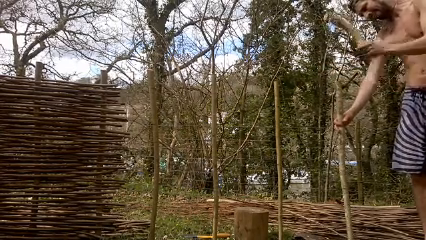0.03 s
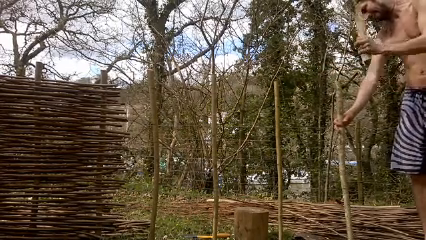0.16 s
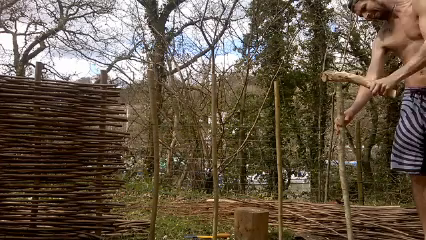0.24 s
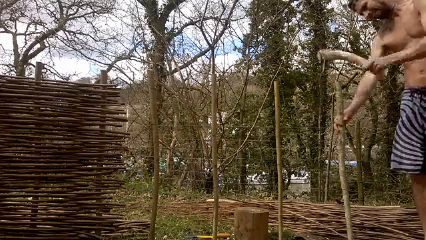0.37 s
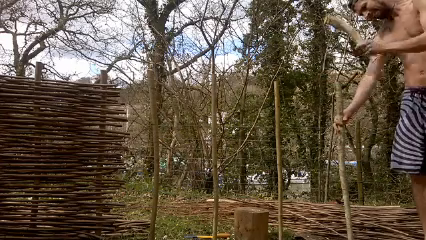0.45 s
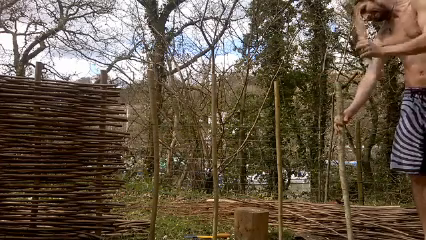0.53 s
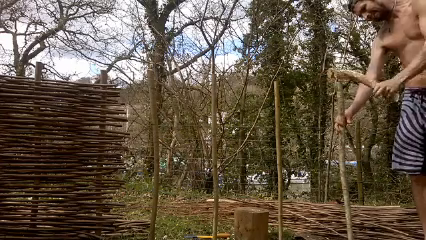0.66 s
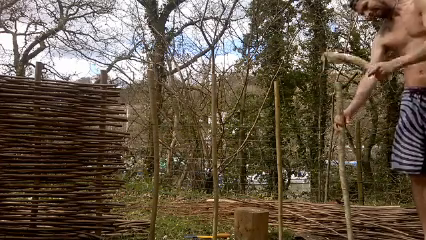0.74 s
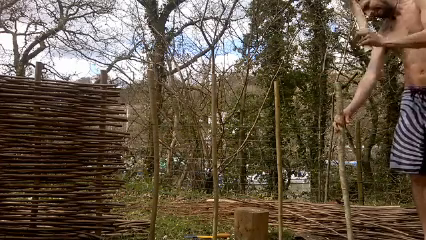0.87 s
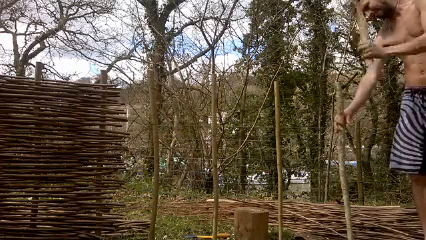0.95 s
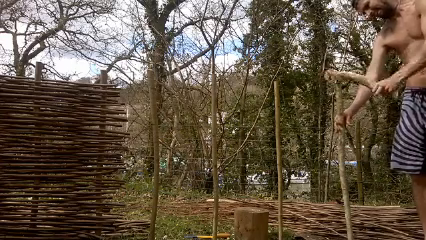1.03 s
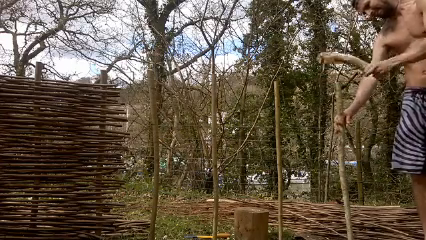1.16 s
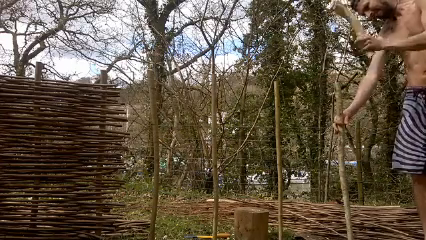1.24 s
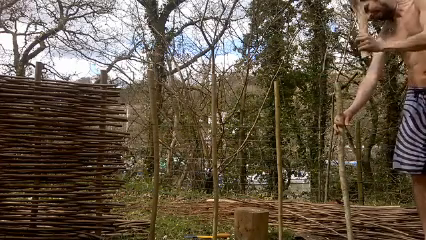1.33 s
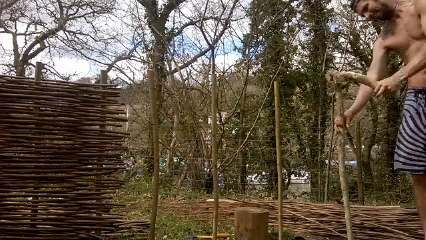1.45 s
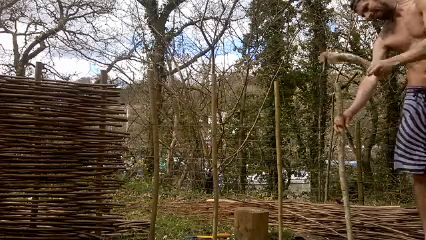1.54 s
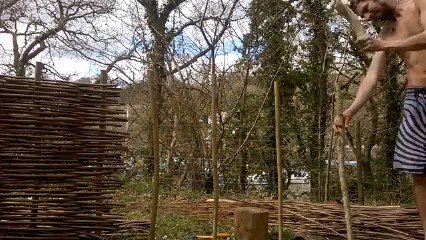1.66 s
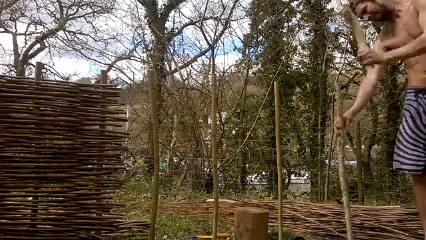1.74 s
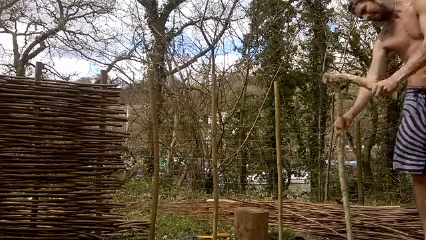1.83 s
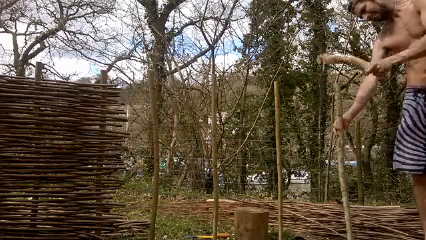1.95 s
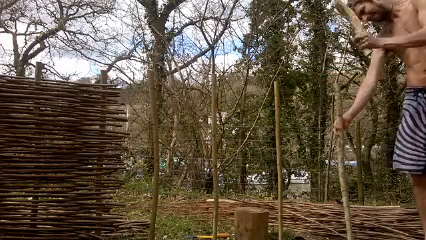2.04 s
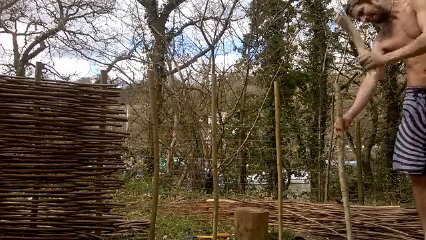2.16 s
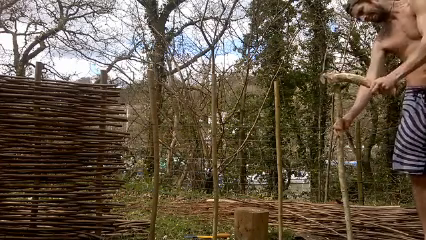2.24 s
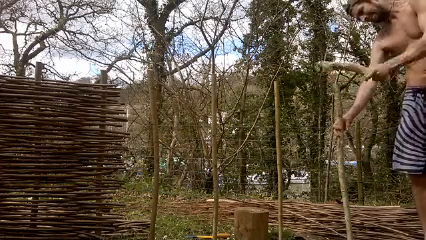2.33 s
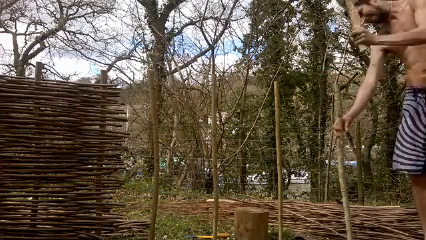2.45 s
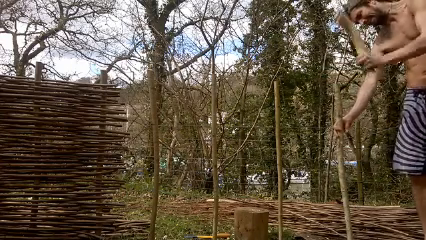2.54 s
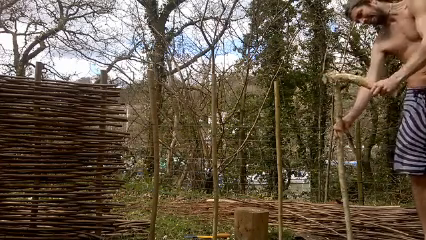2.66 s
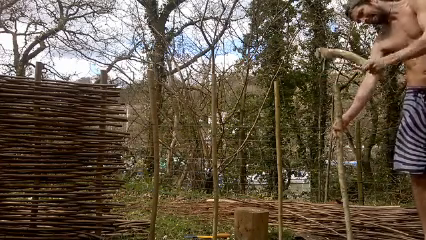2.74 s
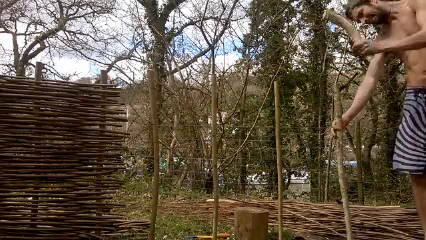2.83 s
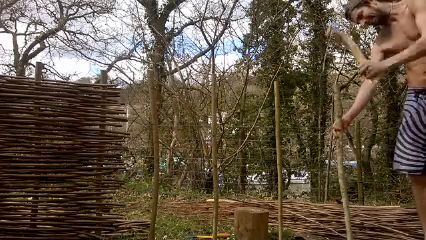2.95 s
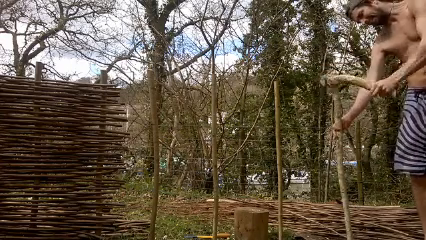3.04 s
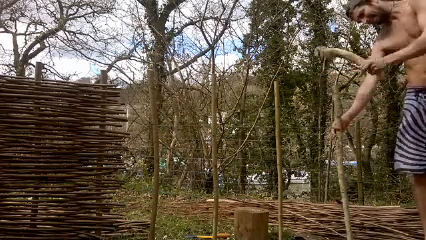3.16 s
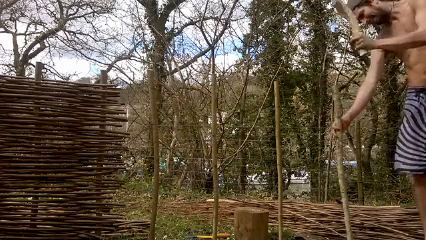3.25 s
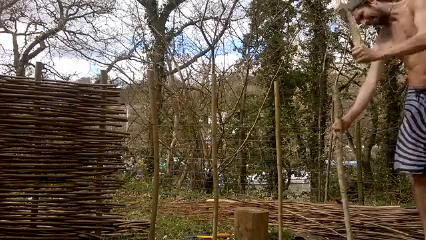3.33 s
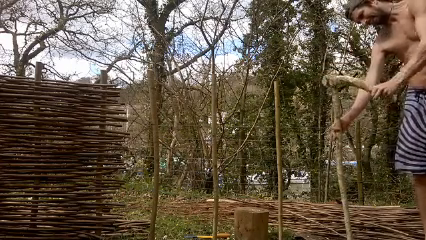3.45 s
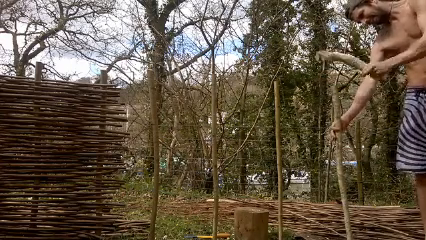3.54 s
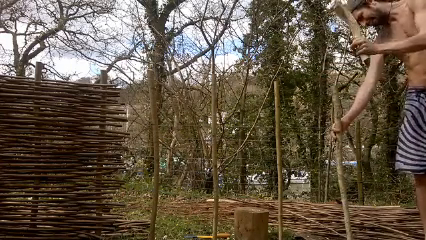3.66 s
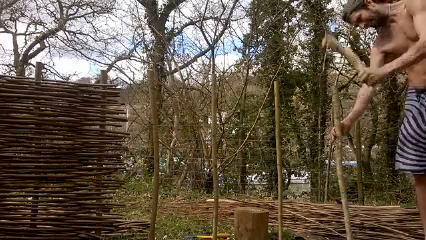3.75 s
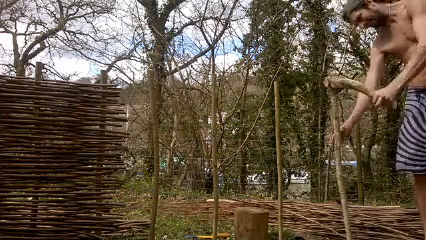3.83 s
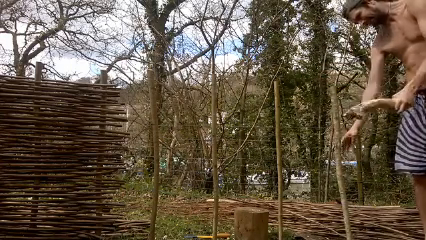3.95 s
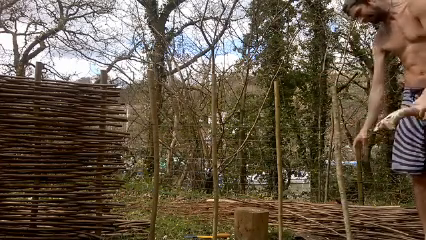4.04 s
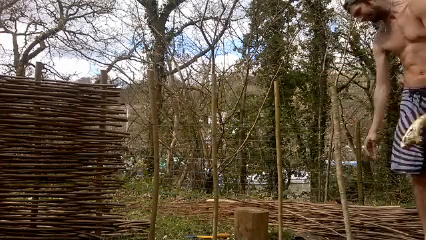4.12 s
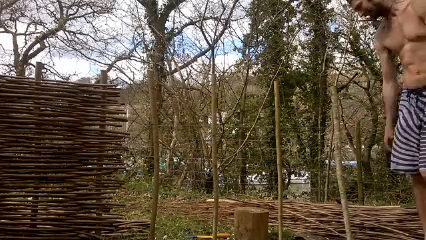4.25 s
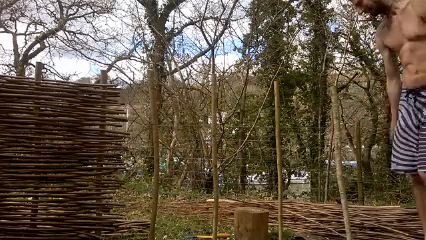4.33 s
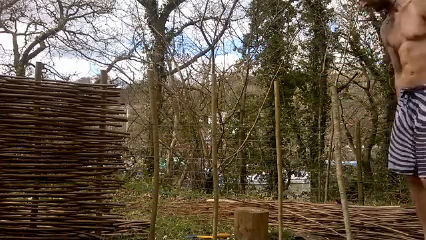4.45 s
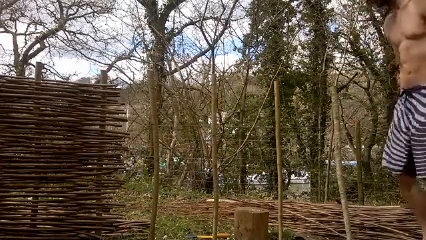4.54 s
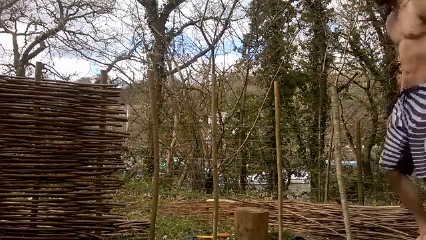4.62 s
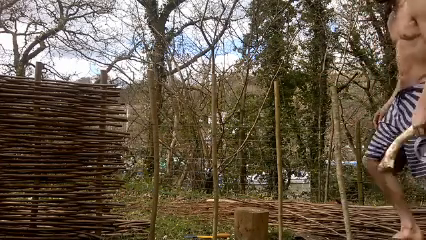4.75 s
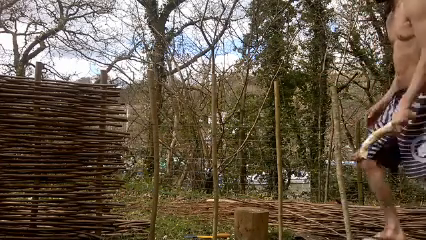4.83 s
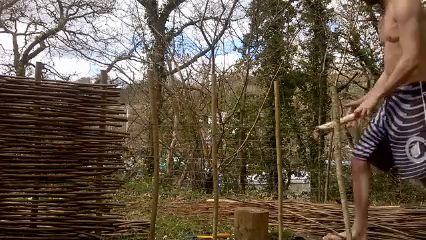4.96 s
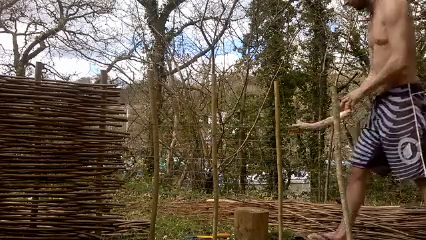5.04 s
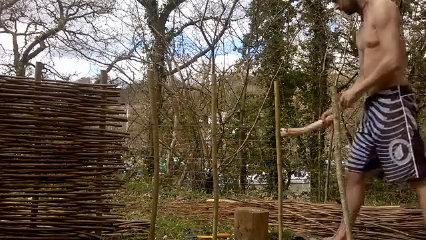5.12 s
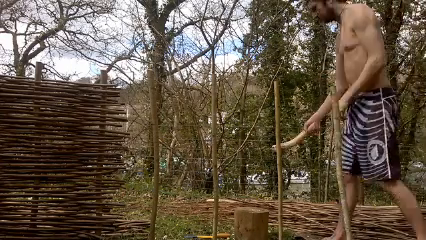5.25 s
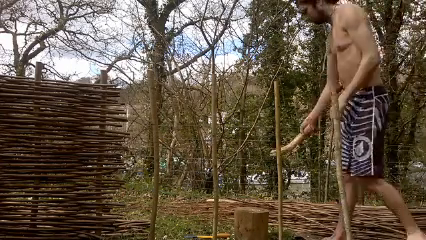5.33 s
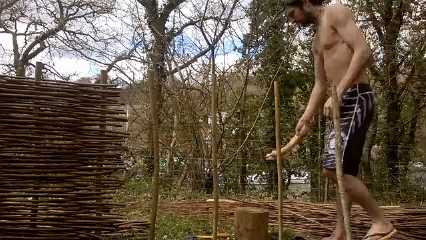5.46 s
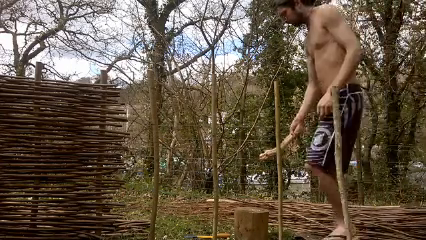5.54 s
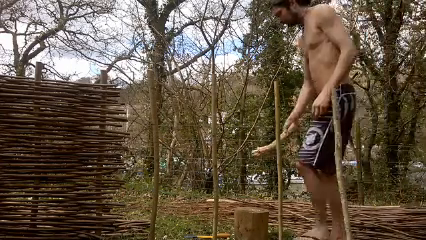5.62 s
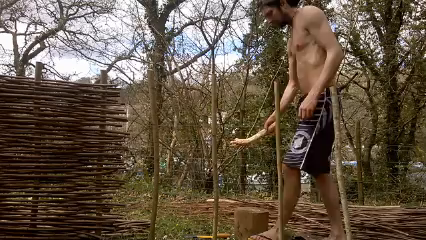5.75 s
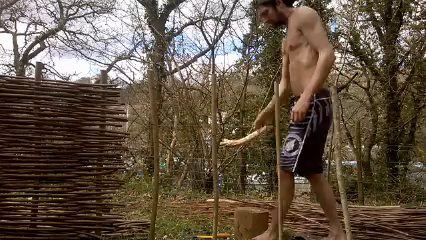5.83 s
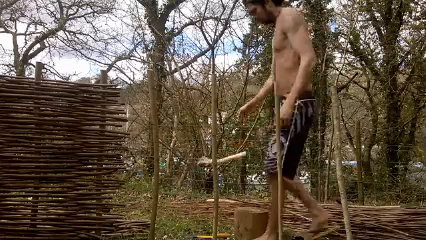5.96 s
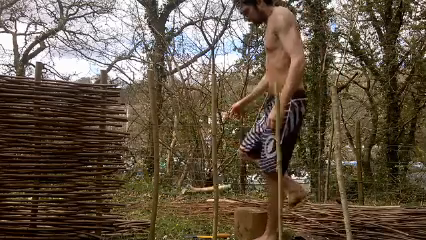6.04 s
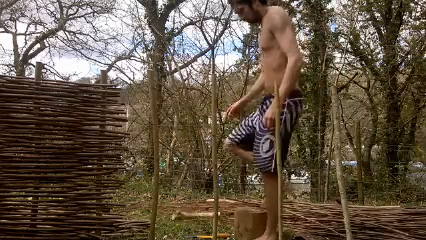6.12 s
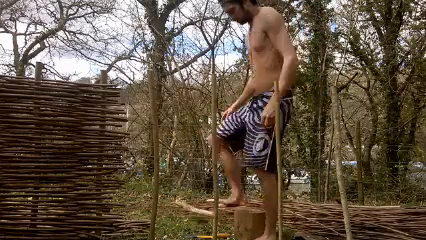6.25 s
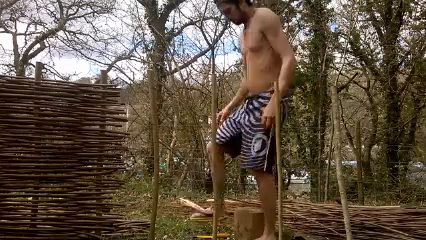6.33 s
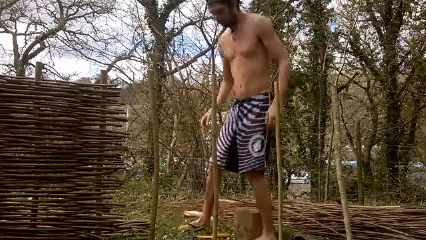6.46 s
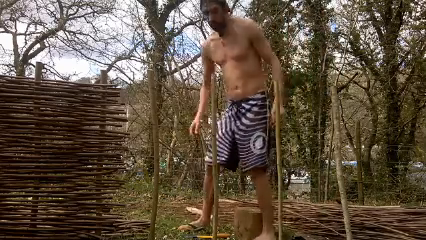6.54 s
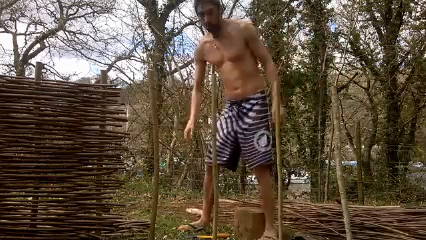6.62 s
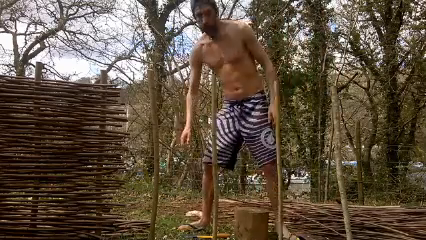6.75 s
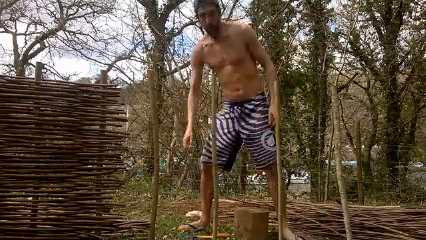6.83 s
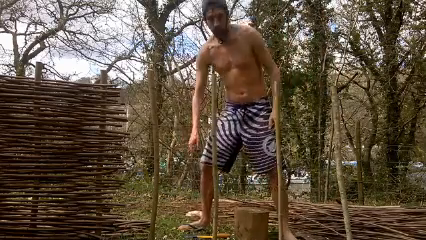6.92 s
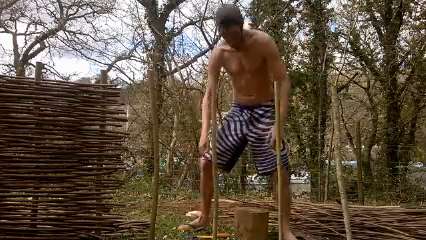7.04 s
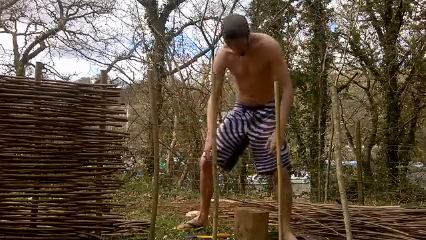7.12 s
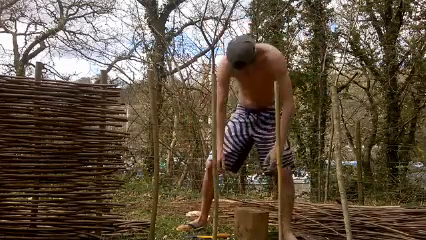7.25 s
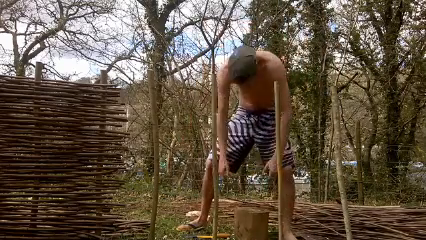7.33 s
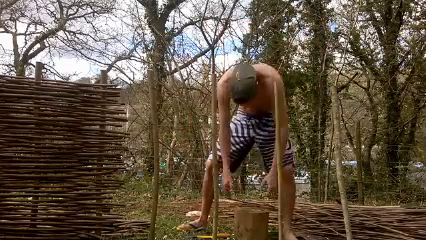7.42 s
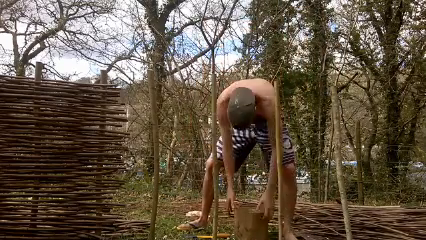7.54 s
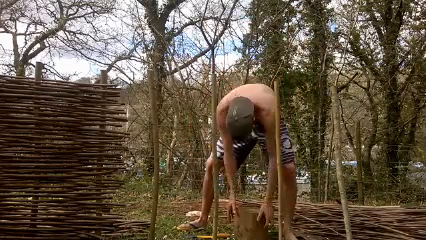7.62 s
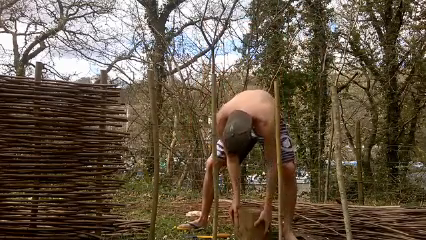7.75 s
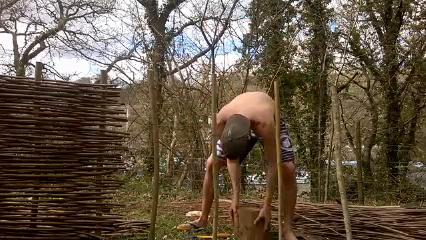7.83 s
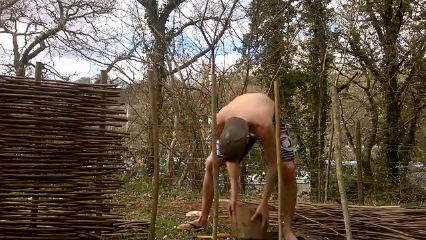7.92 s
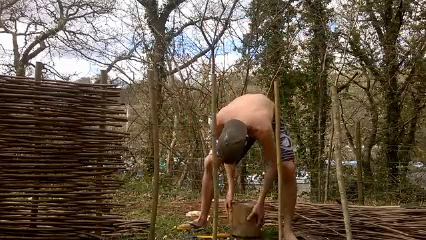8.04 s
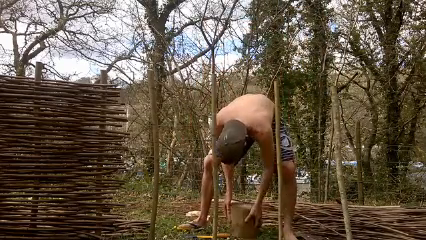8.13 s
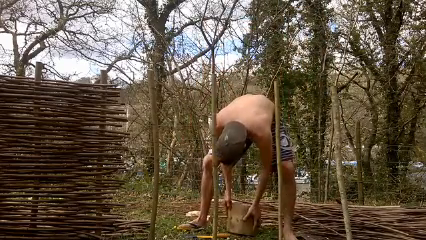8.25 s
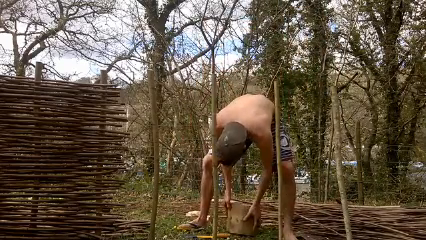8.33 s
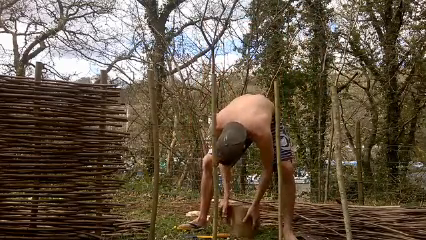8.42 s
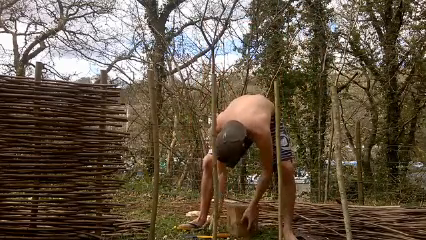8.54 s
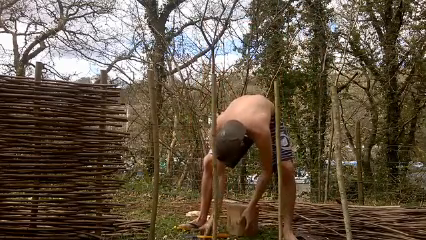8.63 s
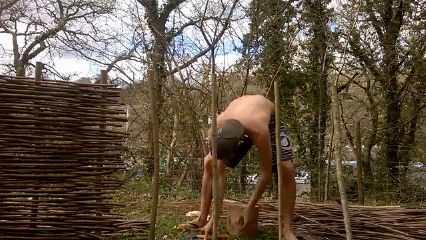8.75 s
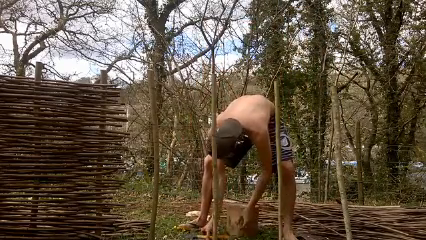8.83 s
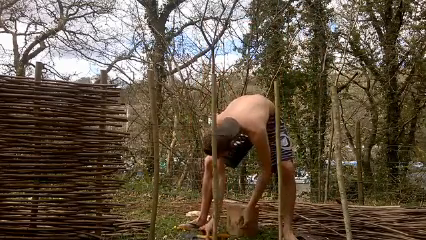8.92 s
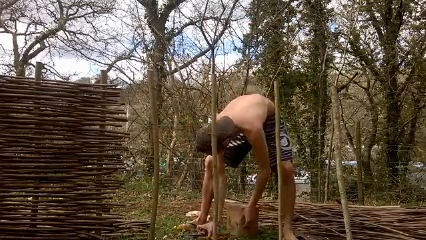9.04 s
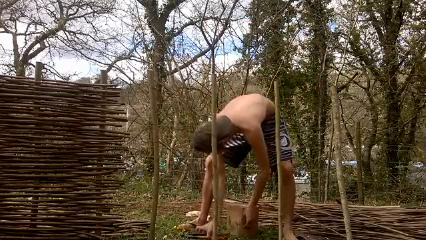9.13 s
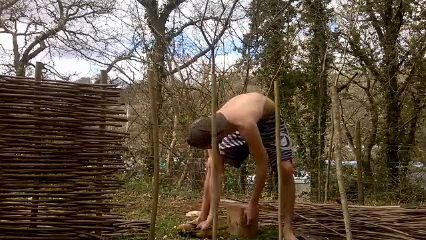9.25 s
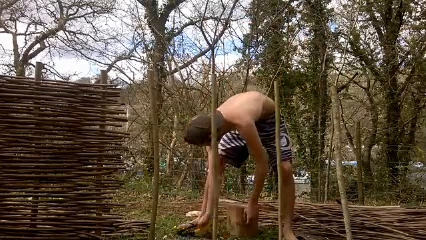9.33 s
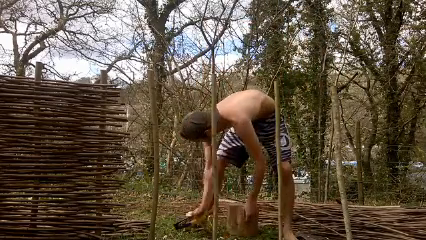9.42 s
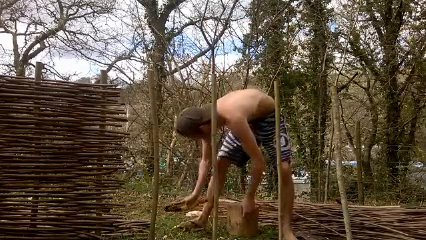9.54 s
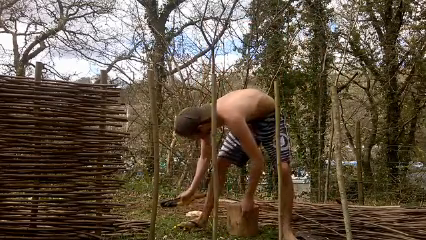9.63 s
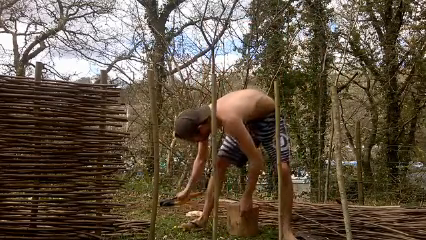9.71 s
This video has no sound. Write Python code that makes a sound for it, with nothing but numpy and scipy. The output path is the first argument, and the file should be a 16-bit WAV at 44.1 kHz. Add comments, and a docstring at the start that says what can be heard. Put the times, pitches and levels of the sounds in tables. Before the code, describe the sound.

Loud dry wood-on-wood knocks, about five every two seconds, ten in all, with short woody ring, splintery crack and scattered woodland echo. When they stop, lively birdsong stands out, with light leaf scuffs. The club lands with a crackly thump on brush, a distant rush passes, then dull low log bumps, twig snaps, a whistle and faint steel rattle. Mono, outdoors, slight breeze on the microphone.

```python
"""Stake driving in a small wood

A wooden club drives a thin stake into soft ground ten times amid songbirds: decaying modes knock, ring
and thud, shaped noise cracks and sizzles, and delayed copies return from a woven fence and the trunks.
Birds are gliding near-sines. A far rush of noise swells and fades; the club drops on twigs, a log is
shifted and a hand tool clinks, made from noise bursts and damped sines. The wood scatters sound as noise tails."""
import sys
import numpy as np
from scipy import signal
from scipy.fft import rfft, irfft
from scipy.io import wavfile
from scipy.ndimage import uniform_filter1d

SR = 44100
rng = np.random.default_rng(int(sys.argv[2]) if len(sys.argv) > 2 else 0)


def master_out(mix):
    """Clip the mix to full scale and print it as 16-bit PCM to the path in sys.argv[1]."""
    frames = np.transpose(np.atleast_2d(mix))
    ceiling = np.clip(frames, -1, 1)
    pcm = np.round(ceiling * 32767).astype(np.int16)
    wavfile.write(sys.argv[1], SR, pcm)


def voltage_ratio(level):
    """Linear amplitude factor for a level in decibels (scalar or array-like)."""
    return 10 ** (np.asarray(level, float) / 20)


N = 431298  # samples in the scene

# Blows of the club: t/s, knock level/dB, ring level/dB, crack level/dB
BLOWS = [(0.2053, -25.5, -35.5, -42), (0.5972, -26, -29.5, -35), (0.9905, -25, -33, -40),
         (1.38, -26, -43, -35.5), (1.7778, -24.5, -28, -36), (2.1698, -24, -27, -33),
         (2.5674, -24.5, -29, -30.5), (2.9595, -24.5, -31.5, -39.5), (3.3553, -24, -39.5, -37),
         (3.7511, -24, -44.5, -42)]
THUD_DB = -26  # the ground answers every blow alike
SIZZLE_DB, SIZZLE_FOLLOWS, MEAN_CRACK_DB = -58, 0.8, -37.5  # the sizzle follows the crack by this share


def blows():
    """Impact excitation: each blow excites modes and fracture noise, then reflection and scattering follow."""
    dull, bright, splinters, fizz, low = np.zeros((5, N))
    t = np.arange(-220, 20000) / SR  # s from the blow; some waves lead it
    for s, knock_db, ring_db, crack_db in BLOWS:
        sizzle_db = SIZZLE_DB + SIZZLE_FOLLOWS * (crack_db - MEAN_CRACK_DB)
        start = s + t[0]
        add(dull, start, voltage_ratio(knock_db) * knock(t))
        add(bright, start, voltage_ratio(ring_db) * ring(t))
        add(splinters, start, voltage_ratio(crack_db) * crack(t))
        add(fizz, start, voltage_ratio(sizzle_db) * sizzle(t))
        add(low, start, voltage_ratio(THUD_DB) * thud(t))
    direct = dull + bright + splinters + fizz
    reflected = fence(bright) + rods(voltage_ratio(-1.5) * splinters + voltage_ratio(2.5) * fizz) + trunks(dull, bright)
    into_wood = voltage_ratio(-19.5) * dull + voltage_ratio(-7.0) * bright + voltage_ratio(-9.0) * (splinters + fizz)
    return low + direct + reflected + wood(into_wood, 0.0024)


# Modes of the knock: f/Hz, relative level/dB, t60/s, arrival after the blow t/s
KNOCK_MODES = [(715, 10, .0085, -.00175), (750, -15, .1, .001), (560, -12, .02, -.0015),
               (1050, -8, .012, -.0012)]
# Spectrum of the noise in the knock: f/Hz, relative level/dB
BODY_SPECTRUM = [(200, -30.5), (300, -10.5), (500, -7.5), (750, -0.5), (1100, -2), (1400, 0), (2200, -26.5)]


def knock(t):
    """Modal superposition: low damped modes, with a shaken noise body beneath them."""
    since = since_splinters(t)
    shake = (1 - np.exp(-since / 0.00053)) * voltage_ratio(-60 * since / 0.2)
    body = colour(rng.standard_normal(len(t)), BODY_SPECTRUM)
    return onset_unit(rung(KNOCK_MODES, t, .003)) + voltage_ratio(-5.0) * onset_unit(body * shake)


# Modes of the ring: f/Hz, relative level/dB, t60/s, arrival after the blow t/s
RING_MODES = [(1768, 0, .036, -.00071), (1690, -7, .03, -.00074), (1450, -12, .02, -.0009),
              (2100, -10, .015, -.00085), (1790, -38, .35, 0)]


def ring(t):
    """Free vibration: bright modes decay exponentially."""
    return onset_unit(rung(RING_MODES, t, 0.00091))


# Spectrum of the crack: f/Hz, relative level/dB
CRACK_SPECTRUM = [(1800, -20), (2500, 0), (3100, 0.5), (4000, -1), (5000, -9), (6500, -24.5), (8000, -34)]
TICK_DB = -5  # first contact of club and stake, against the crack noise


def crack(t):
    """Transient broadband excitation: a splintery noise burst and the tick of first contact."""
    noise = colour(rng.standard_normal(len(t)), CRACK_SPECTRUM)
    tick = colour(np.roll(signal.unit_impulse(len(t)), 128), CRACK_SPECTRUM)
    return onset_unit(noise * splinter_burst(t)) + voltage_ratio(TICK_DB) * onset_unit(tick)


# Spectrum of the sizzle: f/Hz, relative level/dB
SIZZLE_SPECTRUM = [(5000, -20.5), (6500, 7.5), (9000, -0.5), (12000, -11), (15500, -14.5)]


def sizzle(t):
    """Spectral shaping: treble noise under the same burst as the crack."""
    noise = colour(rng.standard_normal(len(t)), SIZZLE_SPECTRUM)
    return onset_unit(noise * splinter_burst(t))


# Modes of the thud: f/Hz, relative level/dB, t60/s, arrival after the blow t/s
THUD_MODES = [(64, -1, .079, .0126), (112.5, 0, .0725, .0026), (133, -6, .118, -.0013),
              (165.5, -3, .105, .0054)]


def thud(t):
    """Ground-borne vibration: low modes, each with its own arrival."""
    return onset_unit(rung(THUD_MODES, t, .003))


def since_splinters(t):
    """Precedence in time: seconds since the first splinters, which lead the blow by 2.3 ms."""
    return np.maximum(t + .0023, 0)


def splinter_burst(t):
    """Double-slope decay: a fast rise, a steep fall and a weak slow tail."""
    since = since_splinters(t)
    return (1 - np.exp(-since / 0.00064)) * (voltage_ratio(-60 * since / 0.04) + 0.06 * voltage_ratio(-60 * since / 0.37))


def onset_unit(x):
    """Normalisation: scales the first 1800 samples to rms 1."""
    return x / np.sqrt(np.mean(x[:1800] ** 2))


# Echoes from the fence: delay t/s, level/dB
FENCE_ECHOES = [(.0153, -5), (.02097, 0), (.0238, -4), (.02663, -12)]


def fence(bright):
    """Specular reflection: the fence returns delayed copies of the bright ring."""
    return echoes(bright, FENCE_ECHOES)


def rods(treble):
    """Multiple scattering: the fence's many rods smear the treble into a noise swell."""
    taps = np.r_[np.zeros(600), rng.standard_normal(800) * np.hanning(800)]
    return signal.oaconvolve(treble, taps / np.linalg.norm(taps))[:N]


# Echoes from the trunks: delay t/s, level/dB
TRUNK_ECHOES = [(.045, -26), (.056, -22.5), (.071, -37.5), (0.086, -22), (.102, -38), (.128, -28.5),
                (.141, -61.5), (.155, -41), (.167, -46), (.212, -43.5), (.237, -49)]


def trunks(dull, bright):
    """Specular reflection: the trunks return the ring and a quarter of the knock's amplitude."""
    return echoes(dull / 4 + bright, TRUNK_ECHOES)


# Decay time of the wood: f/Hz, t60/s
WOOD_DECAY = [(200, 0.067), (500, 0.27), (1000, .33), (2000, 0.28), (4000, 0.26), (8000, .15),
              (14000, 0.015)]


def wood(x, rise):
    """Diffuse reverberation: random taps among trees build up and die band by band."""
    f, t60 = np.transpose(WOOD_DECAY)
    hz, t, bands = signal.stft(rng.standard_normal(SR), SR, nperseg=256)
    bands *= voltage_ratio(-60 * t / np.interp(hz, f, t60)[:, None])
    tail = signal.istft(bands, SR, nperseg=256)[1]
    tail *= 1 - np.exp(-np.arange(len(tail)) / SR / rise)
    return signal.oaconvolve(x, tail / np.linalg.norm(tail))[:N]


def handling():
    """Superposition with scattering: snaps, scuffs, club, ground and tool, plus the wood's answer."""
    out = snaps() + dropped_club() + scuffs() + bumps() + tool()
    return out + voltage_ratio(-13.0) * wood(out, 0.0017)


SNAP_RISE = 0.0063  # rise time as a share of the t60, for snaps and the dropped club
# Snapping twigs, and at 5.965 s the click of the club's first touch (two rows):
# t/s, level/dB, t60/s, centre f/Hz, width/octaves (6 dB down this far to each side)
SNAPS = [(4.61, -73.5, 0.031, 4014, 1.14), (5.965, -39.5, 0.013, 500, 1), (5.966, -50.5, 0.027, 3430, 1.1),
         (6.092, -50.5, 0.44, 4090, 0.45), (6.3237, -50, 0.056, 4000, 0.51),
         (6.34, -54.5, 0.36, 3710, 0.44), (6.41, -58.5, 0.16, 3520, 0.75), (8.439, -63, 0.035, 4790, 0.52),
         (8.621, -54, 0.056, 2570, 0.58), (8.623, -59, 0.04, 530, 0.44), (8.642, -61, 0.032, 3000, 0.68),
         (8.696, -61, 0.096, 552, 0.25), (9.003, -64, 0.22, 5570, 0.28)]


def snaps():
    """Transient excitation: sudden crackling band noise for snapping twigs and the club's first touch."""
    out = np.zeros(N)
    for s, db, t60, hz, octaves in SNAPS:
        add(out, s, crackle(db, t60, hz, octaves, SNAP_RISE * t60))
    return out


DROP_S = 6.116
# Bands of the club landing on brush: level/dB, t60/s, centre f/Hz, width/octaves (6 dB down to each side)
DROP_BANDS = [(-40, .21, 89, 1.16), (-41.5, 0.13, 178, 0.27), (-49, 0.15, 700, 1.3),
              (-51.5, 0.24, 1760, 0.13), (-39, 0.24, 3600, 0.52), (-52.5, 0.186, 7200, 0.467)]


def dropped_club():
    """Band superposition: noise bands start together and decay separately."""
    out = np.zeros(N)
    for db, t60, hz, octaves in DROP_BANDS:
        add(out, DROP_S, crackle(db, t60, hz, octaves, SNAP_RISE * t60))
    return out


SCUFF_RISE_S = 0.024
# Feet scuffing leaves, and at 9.235 s a bright scrape of the tool:
# t/s, level/dB, t60/s, centre f/Hz, width/octaves (6 dB down to each side)
SCUFFS = [(4.28, -54, 0.2, 2520, 1.07), (5.059, -60.5, 0.41, 3470, 0.81), (7.9, -69.5, 1, 890, 0.65),
          (8.09, -55.5, 0.218, 2380, 1.2), (9.235, -56, 0.23, 5400, 0.35)]


def scuffs():
    """Friction noise: crackling bands with a slower rise, for scuffed leaves and a scrape of the tool."""
    out = np.zeros(N)
    for s, db, t60, hz, octaves in SCUFFS:
        add(out, s, crackle(db, t60, hz, octaves, SCUFF_RISE_S))
    return out


def crackle(db, t60, hz, octaves, rise):
    """Amplitude modulation: noise of wandering level, band-limited, that rises and decays."""
    t = handling_time()
    wander_db = 2.8 * unit(uniform_filter1d(rng.standard_normal(len(t)), size=40))
    grains = rng.standard_normal(len(t)) * voltage_ratio(wander_db)
    band = [(hz * 2 ** (k * octaves), -6 * k * k) for k in (-3, -2, -1, 0, 1, 2, 3)]
    return voltage_ratio(db - 60 * t / t60) * (1 - np.exp(-t / rise)) * unit(colour(grains, band))


BUMP_T60_S, BUMP_RISE_S = 0.12, 0.0076
# Soft bumps of club, feet and log on the ground: t/s, level/dB, f/Hz
BUMPS = [(6.451, -46.5, 105), (6.989, -56, 53.8), (7.569, -48.5, 48.4), (7.619, -45, 37.7),
         (7.779, -42.5, 45.8), (7.919, -46, 59), (7.965, -33.5, 42.8), (8.039, -48.5, 43.1),
         (8.084, -40, 37.2), (8.145, -37, 40.8), (8.182, -32, 43.1), (8.269, -45.5, 48.5),
         (8.489, -46, 43.1), (8.56, -36.5, 51.7), (8.714, -41.5, 60), (9.298, -48.5, 37.7),
         (9.381, -49, 45.4), (9.534, -46, 65.2)]


def bumps():
    """Damped resonance: each bump is one low sine dying in the ground."""
    out = np.zeros(N)
    for s, db, hz in BUMPS:
        add(out, s, voltage_ratio(db) * rung([(hz, 0, BUMP_T60_S, 0)], handling_time(), BUMP_RISE_S))
    return out


TILT_PIVOT_HZ = 1700
# Clinks: t/s, level/dB, t60 of the scrape/s, tilt above the pivot/(dB per octave); softer contact is duller
CLINKS = [(9.029, -62.5, 0.056, 0), (9.04, -64, 0.037, -2), (9.048, -63, 0.048, 0),
          (9.183, -74, 0.061, -2.5), (9.2, -81.5, 0.43, -3), (9.243, -73.5, 0.15, -4),
          (9.275, -76, 0.082, -4), (9.338, -80.5, 0.07, -9)]
# Modes of the steel tool: f/Hz, width/Hz, level/dB
TOOL_MODES = [(730, 35, -16), (1690, 40, -10), (2180, 60, -24), (2540, 75, -23), (2748, 58, 1.5),
              (3030, 114, 1), (3540, 42, 0), (4080, 21, -6.5), (4860, 38, -16), (5300, 66, -27),
              (6150, 140, -41)]


def tool():
    """Source-filter principle: gritty contacts excite the damped modes of rattling steel."""
    taps = np.zeros(N)
    t = handling_time()
    for s, db, t60, tilt_db in CLINKS:
        grit = voltage_ratio(2.9 * unit(uniform_filter1d(rng.standard_normal(len(t)), size=60)))
        tilt = [(200, 0), (TILT_PIVOT_HZ, 0), (8 * TILT_PIVOT_HZ, 3 * tilt_db)]
        contact = colour(rng.standard_normal(len(t)), tilt)
        add(taps, s, voltage_ratio(db - 60 * t / t60) * (1 - np.exp(-t / 0.000654)) * grit * contact)
    steel = sum(voltage_ratio(db) * np.exp(-np.pi * width * t) * np.sin(2 * np.pi * hz * t)
                for hz, width, db in TOOL_MODES)
    scrape = colour(taps, [(1000, -28), (1700, 1), (2500, 16.5), (4000, -34.0), (7000, -19.5)])
    return signal.oaconvolve(taps, steel)[:N] + voltage_ratio(15.5) * scrape


def handling_time():
    """Time base: seconds from the start of one handling sound."""
    return np.arange(14000) / SR


def birds():
    """Direct and diffuse field: the notes and the far warble, both scattered by the trees."""
    clear = swoops() + whistles() + tones() + seeps() + pairs() + near_whistle()
    far = warble()
    return clear + far + wood(voltage_ratio(-10) * clear + voltage_ratio(-3.0) * far, 0.014)


SWOOP_SETTLE_S, SWOOP_START_DB = .008, -16
# Notes that start far from their pitch and settle: start t/s, length t/s, level/dB, from f/Hz, settles at f/Hz
SWOOPS = [(2.13, .035, -59.5, 4906, 5480), (2.532, .03, -49, 6890, 4112), (2.846, .042, -55, 7300, 5270),
          (2.893, .059, -56, 4000, 3430), (3.078, .035, -56.5, 4965, 3810), (3.18, .028, -51.5, 7200, 4320),
          (3.508, .03, -52, 7000, 3796), (3.86, 0.038, -49.5, 7200, 4050), (4.029, .047, -69, 7110, 6590),
          (4.21, .045, -57, 7000, 5280), (4.218, .088, -51, 4278, 3415), (4.515, .088, -52.5, 7000, 4415),
          (4.692, .035, -52.5, 4250, 3400), (4.713, .1, -77, 2860, 2523), (4.865, .045, -52.5, 7200, 3646),
          (7.641, .065, -75.5, 5630, 6460)]


def swoops():
    """Exponential frequency glide: pitch and level settle together."""
    out = np.zeros(N)
    for s, length, db, from_hz, to_hz in SWOOPS:
        left = np.exp(-np.arange(0, length, 1 / SR) / SWOOP_SETTLE_S)
        sing(out, s, to_hz + (from_hz - to_hz) * left, db + SWOOP_START_DB * left)
    return out


# Notes that glide evenly: start t/s, length t/s, level/dB, from f/Hz, to f/Hz
WHISTLES = [(.09, .105, -81.5, 2840, 3100), (.33, .04, -60.5, 3540, 3530), (0.658, .32, -60.5, 4150, 4030),
            (1.101, .14, -58.5, 4185, 3643), (1.278, .1, -75, 2720, 2700), (1.476, .04, -62, 4150, 3550),
            (1.508, .045, -68, 3550, 3480), (1.551, .065, -66.5, 3230, 3170), (1.64, .13, -73, 3400, 3390),
            (1.909, .05, -71.5, 6200, 6150), (1.918, .042, -61, 4290, 4320), (1.991, .118, -83, 4660, 4560),
            (1.993, .118, -83.5, 6100, 5930), (2.43, .1, -83.5, 5680, 5700),
            (2.72, .035, -78.5, 5610, 5680), (2.753, .045, -64, 5600, 3420), (2.88, .02, -55, 5354, 3700),
            (3.122, .035, -59.5, 4880, 4200), (3.165, .025, -51, 4100, 3870),
            (3.208, .075, -63, 4480, 4400), (3.289, .058, -58.5, 4850, 4530),
            (3.562, .035, -56.5, 3920, 3880), (3.628, .034, -54, 4250, 4210),
            (3.665, .08, -79.5, 4200, 4260), (3.889, 0.032, -52.5, 4050, 4710),
            (3.925, .027, -52.5, 4500, 3920), (3.984, .058, -72, 4680, 4500),
            (4.078, .012, -71, 6400, 5780), (4.097, .03, -66.5, 6580, 6540),
            (4.122, .022, -61.5, 5400, 7100), (4.15, .032, -56, 5100, 3720), (4.256, .03, -53, 5250, 4100),
            (4.306, .018, -50, 4250, 3740), (4.364, .028, -53.5, 4110, 3360), (4.499, .02, -58, 3520, 3040),
            (4.562, .025, -52, 4300, 3290), (4.635, .03, -52.5, 4860, 3830), (4.719, .1, -63.5, 3560, 3615),
            (4.707, .09, -70, 3080, 3000), (4.9, .045, -51, 4460, 2978), (4.901, 0.098, -64.5, 4400, 4330),
            (5.049, 0.053, -62, 4050, 3950), (5.082, 0.037, -60, 3250, 3000), (4.93, .07, -57, 3950, 3920),
            (5.198, .08, -63.5, 3930, 3880), (5.312, .05, -66, 3900, 3830), (6.993, .25, -73.5, 5340, 5330),
            (7.555, .04, -75.5, 4950, 4900), (8.724, .1, -71.5, 3450, 3310), (9.409, .2, -85, 4520, 4400),
            (9.712, .06, -78, 3550, 3400)]


def whistles():
    """Linear frequency glide: evenly sliding notes."""
    return glides(WHISTLES, 14)


TONE_WAVER_HZ = 45
# Faint low tones inside the rush: start t/s, length t/s, level/dB, from f/Hz, to f/Hz
TONES = [(5.56, 0.11, -66.5, 1730, 1750), (6.52, 0.47, -73.5, 512, 482), (6.6, .5, -76.5, 1200, 1120)]


def tones():
    """Frequency modulation: a wide random waver makes low tones fuzzy."""
    return glides(TONES, TONE_WAVER_HZ)


def glides(table, waver_hz):
    """Linear interpolation of frequency: each note slides under one arch."""
    out = np.zeros(N)
    for s, length, db, from_hz, to_hz in table:
        u = np.arange(0, length, 1 / SR) / length
        sing(out, s, from_hz + (to_hz - from_hz) * u, db + arch_db(u), waver_hz)
    return out


SEEP_SETTLE_S, SEEP_DROP = .03, 0.098  # the drop is a share of the settled pitch
# Thin far calls that sag: start t/s, length t/s, level/dB, settles at f/Hz
SEEPS = [(2.742, .1, -85, 6630), (3.0, 0.065, -92, 6700), (5.18, .17, -86, 6420),
         (5.402, .155, -78.5, 6440), (5.591, 0.16, -77.5, 6510), (6.9, .1, -82, 6280),
         (7.542, .07, -84, 6660), (8.401, 0.22, -79, 6880), (9.392, .165, -82.5, 6480),
         (9.63, 0.13, -79, 6400)]


def seeps():
    """Exponential frequency relaxation: thin calls sag to their pitch."""
    out = np.zeros(N)
    for s, length, db, hz in SEEPS:
        t = np.arange(0, length, 1 / SR)
        sing(out, s, hz * (1 + SEEP_DROP * np.exp(-t / SEEP_SETTLE_S)), db + arch_db(t / length))
    return out


# The two voices start at these pitches and sag from the first call on
PAIR_HZ, PAIR_UPPER_DB, PAIR_SAG_HZ_PER_S = (3880, 4400), -4.5, 600
# A two-voiced call, repeated: start t/s, length t/s, level/dB
PAIRS = [(7.78, .058, -62), (7.86, 0.047, -61), (7.942, 0.04, -64), (8.002, 0.15, -71.5)]


def pairs():
    """Two-source superposition: two voices sound at once and sag alike."""
    out = np.zeros(N)
    for s, length, db in PAIRS:
        t = np.arange(0, length, 1 / SR)
        sag = PAIR_SAG_HZ_PER_S * (t + s - PAIRS[0][0])
        for hz, voice_db in zip(PAIR_HZ, (db, db + PAIR_UPPER_DB)):
            sing(out, s, hz - sag, voice_db + arch_db(t / length))
    return out


OVERTONE_DB = -45  # against the fundamental
# Course of one near whistle that swells: t/s, f/Hz, level/dB
NEAR_WHISTLE = [(8.7, 3463, -80), (8.728, 3854, -65), (8.748, 3912, -54), (8.784, 3917, -54.5),
                (8.824, 3888, -46.5), (8.834, 3950, -53), (8.864, 3984, -49), (8.885, 4160, -71.5)]


def near_whistle():
    """Harmonic series: a fundamental and its faint octave follow one course."""
    out = np.zeros(N)
    s, hz, db = np.transpose(NEAR_WHISTLE)
    t = np.arange(s[0], s[-1], 1 / SR)
    pitch, level_db = np.interp(t, s, hz), np.interp(t, s, db)
    sing(out, s[0], pitch, level_db)
    sing(out, s[0], 2 * pitch, level_db + OVERTONE_DB)
    return out


PHRASE_EDGE = .4  # share of a phrase spent swelling and fading
# Phrases of far warbling, before random spread: start t/s, length t/s, level/dB, from f/Hz, to f/Hz
CHATTER = [(0.0, 0.13, -78.5, 3870, 3180), (0.293, 0.11, -67, 3700, 3780), (0.421, 0.18, -81, 3730, 3790),
           (0.753, .22, -64, 3950, 3950), (1.095, 0.2, -71, 3950, 3890), (1.167, .2, -76.5, 4750, 4770),
           (2.754, .1, -71, 4650, 4680), (2.865, 0.044, -56, 3900, 3860), (3.081, 0.32, -61.5, 4000, 4064),
           (3.36, 0.26, -60, 3750, 3976), (3.2, .4, -70, 3195, 3125), (4.128, 0.14, -58, 4400, 3680),
           (4.272, 0.31, -59, 3750, 3910), (4.552, 0.29, -61, 3900, 3445), (4.843, 0.37, -67, 3900, 3400),
           (5.661, 0.46, -64.5, 4120, 4570)]


def warble():
    """Granular superposition: short falling chirps of random pitch and size overlap in phrases."""
    out = np.zeros(N)
    u = np.linspace(0, 1, 900)
    for s, length, db, from_hz, to_hz in CHATTER:
        for along in np.arange(0, length, .007) / length:  # a chirp every 7 ms
            shift, fall, size = rng.uniform(-1.1, 1, 3)
            centre = (from_hz + (to_hz - from_hz) * along) * (1 + .15 * shift)
            pitch = centre * (1 + (.16 + .08 * fall) * (.5 - u))
            chirp = np.sin(2 * np.pi * np.cumsum(pitch) / SR) * np.hanning(len(u))
            swell = min(1, 2 * min(along, 1 - along) / PHRASE_EDGE + .1)
            add(out, s + along * length, voltage_ratio(db) * swell * 3 ** size * chirp)
    return out


def sing(mix, start, hz, db, waver_hz=14):
    """Phase integration: a near-sine follows pitch and level sample by sample, with a slight flutter."""
    flutter = unit(uniform_filter1d(rng.standard_normal(len(hz)), size=250))
    turns = np.cumsum(hz * (1 + 0.0045 * flutter) + waver_hz * flutter) / SR
    edges = signal.windows.tukey(len(hz), min(400 / len(hz), 1))
    add(mix, start, voltage_ratio(db + 2.5 * flutter) * np.sqrt(2) * np.sin(2 * np.pi * turns) * edges)


ARCH_POWER = .4


def arch_db(u):
    """Amplitude envelope: a sine arch to a power swells and fades a note, u from 0 to 1."""
    return 20 * ARCH_POWER * np.log10(abs(np.sin(np.pi * u)) + 1e-3)


def background():
    """Superposition of independent noises: far rush, breeze and still air."""
    return rush() + breeze() + air()


# Spectrum of the rush: f/Hz, relative level per hertz/dB
RUSH_SPECTRUM = [(150, -41.5), (250, -8), (364, -10.5), (498, -5), (770, -6.5), (1070, -4.5), (1140, 0.5),
                 (1470, -1.5), (2070, 4.5), (5410, -4.5), (9000, -38), (11700, -66), (19800, -120)]
# Course of the rush: t/s, level/dB
RUSH_LEVEL = [(4.95, -94), (5.06, -68), (5.6, -64), (6.4, -61.5), (6.91, -61.5), (7.67, -67.5),
              (8.55, -79.5)]


def rush():
    """Envelope modulation: broad far noise swells and fades."""
    noise = unit(colour(rng.standard_normal(N), RUSH_SPECTRUM))
    return noise * voltage_ratio(np.interp(np.arange(N) / SR, *np.transpose(RUSH_LEVEL), -120, -120))


# Spectrum of the breeze: f/Hz, relative level per hertz/dB
BREEZE_SPECTRUM = [(12, -27), (20, 1), (38, -0.5), (76, -0.5), (113, -5), (200, -16), (260, -44.5),
                   (440, -120)]
# Course of the breeze: t/s, level/dB
BREEZE_LEVEL = [(0.0, -72.5), (2.0, -71.5), (3.8, -73), (4.3, -77), (4.6, -73.5), (5.2, -76.5),
                (6.5, -74.5), (7.57, -75.5), (8.1, -63), (8.31, -68.5), (9.12, -73), (9.78, -68.5)]


def breeze():
    """Flow noise: low-frequency noise of uneven level, a lumpy breeze on the microphone."""
    noise = unit(colour(rng.standard_normal(N), BREEZE_SPECTRUM))
    return noise * voltage_ratio(np.interp(np.arange(N) / SR, *np.transpose(BREEZE_LEVEL)))


AIR_DB = -74  # rms level between 200 Hz and 16 kHz
# Spectrum of the still air: f/Hz, relative level per hertz/dB
AIR_SPECTRUM = [(76, -29), (130, -1), (829, -13.5), (1170, -12.5), (3830, -15.5), (4500, -11), (5290, -23),
                (6730, -22.5), (7910, -25.5), (12300, -30.5), (13300, -41), (16000, -46.5)]


def air():
    """Stationary noise: a steady spectrum, scaled by its level in the audible band."""
    noise = colour(rng.standard_normal(N), AIR_SPECTRUM)
    heard = colour(noise, [(200, 0), (16000, 0)])
    return voltage_ratio(AIR_DB) * noise / np.sqrt(np.mean(heard ** 2))


def rung(modes, t, rise):
    """Modal decay: dying sines, each starting when its wave arrives."""
    out = np.zeros(len(t))
    for hz, db, t60, lag in modes:
        since = np.maximum(t - max(lag, -1 / 400), 0)
        out += voltage_ratio(db - 60 * since / t60) * (1 - np.exp(-since / rise)) * np.sin(2 * np.pi * hz * since)
    return out


def echoes(x, table):
    """Discrete reflection: delayed copies, each at its own level."""
    out = np.zeros(len(x))
    for s, db in table:
        add(out, s, voltage_ratio(db) * x)
    return out


def colour(x, points):
    """Linear filtering: weights the spectrum by levels in dB interpolated over log frequency."""
    f, db = np.transpose(points)
    hz = np.fft.rfftfreq(len(x), 1 / SR)
    gain_db = np.interp(np.log(hz + 1), np.log(f), db, -90, -90)
    return irfft(rfft(x) * voltage_ratio(gain_db), len(x))


def unit(x):
    """Normalisation: scales to rms 1."""
    return x / np.sqrt(np.mean(x ** 2) + 1e-20)


def add(mix, s, sound):
    """Linear superposition: mixes a sound in at time s."""
    part = mix[round(s * SR):][:len(sound)]
    part += sound[:len(part)]


def scene():
    """Linear superposition: all sources at one microphone."""
    return (blows() + handling() + birds() + background())[None]


def low_pass(x):
    """Removes everything above the highest recorded frequency."""
    return signal.sosfilt(signal.butter(12, 16360, fs=SR, output="sos"), x)


def record(dry):
    """Single-channel pickup: passes on the finished mix."""
    return low_pass(dry)


dry = scene()
out = record(dry)
master_out(out)
```